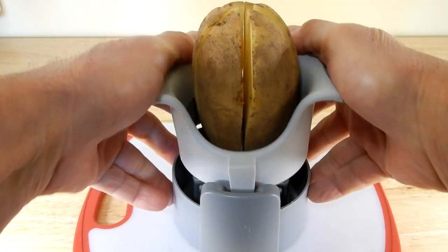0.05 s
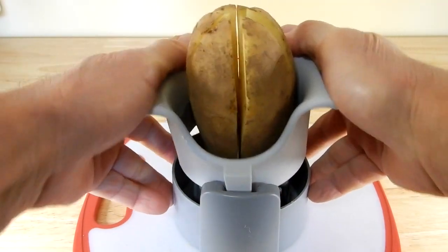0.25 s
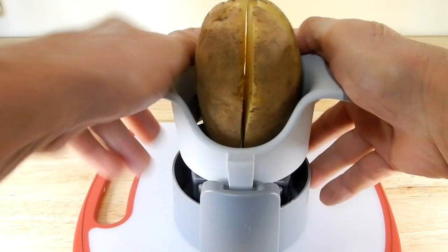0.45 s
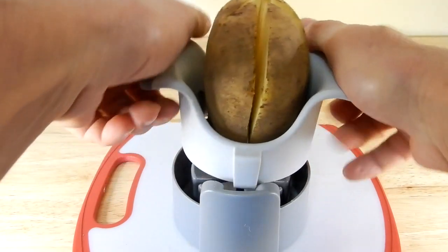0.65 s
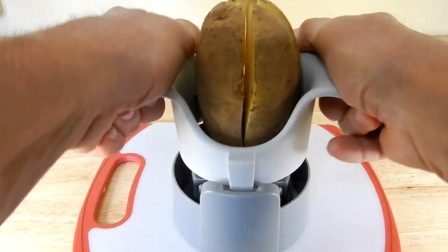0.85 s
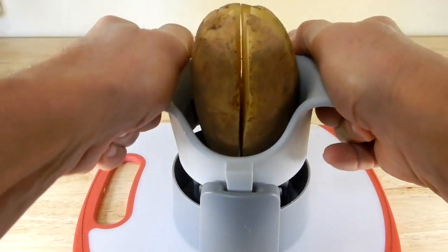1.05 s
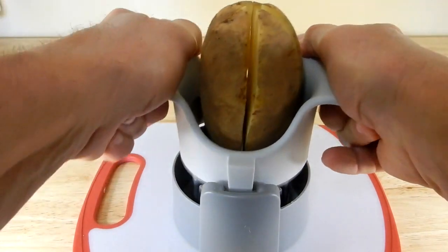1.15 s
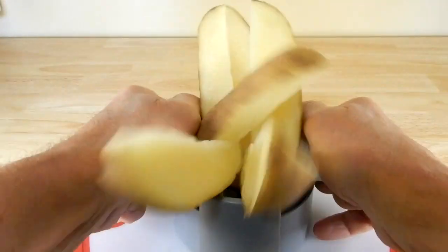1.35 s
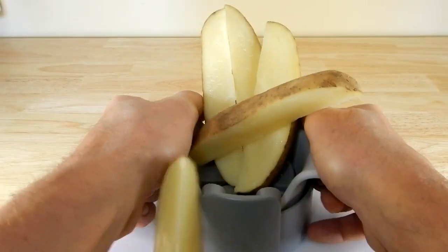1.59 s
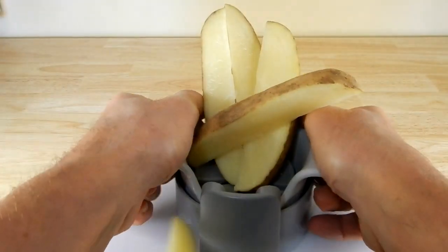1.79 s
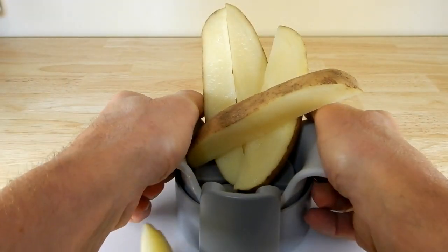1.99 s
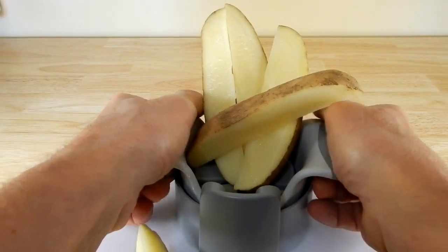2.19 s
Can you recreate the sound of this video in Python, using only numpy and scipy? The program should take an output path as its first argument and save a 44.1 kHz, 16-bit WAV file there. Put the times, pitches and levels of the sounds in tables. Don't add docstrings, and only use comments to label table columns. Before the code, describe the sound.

Close up in a small indoor room, hands creak and click a plastic potato cutter over low hum, then a sudden loud crunching crack hits, the hum dips, and cut pieces settle with dull taps.

```python
import sys
import numpy as np
from scipy import signal
from scipy.fft import rfft, irfft
from scipy.io import wavfile
from scipy.ndimage import uniform_filter1d

SR = 44100
rng = np.random.default_rng(int(sys.argv[2]) if len(sys.argv) > 2 else 0)


def linear_from_db(decibels):
    return 10 ** (np.asarray(decibels, float) / 20)


def store_wav(level_fs):
    pcm = np.round(np.clip(np.atleast_2d(level_fs), -1, 1) * 32767)
    wavfile.write(sys.argv[1], SR, pcm.T.astype(np.int16))


N = 98298
T = np.arange(N) / SR


def unit(x):
    return x / np.sqrt(np.mean(x ** 2))


def ring(x, hz, t60_s):
    pole = np.exp(2j * np.pi * hz / SR - np.log(1000) / (max(t60_s, 1e-3) * SR))
    return signal.lfilter([1], [1, -pole], x).imag


def band(x, hz, width_hz):
    return signal.lfilter(*signal.iirpeak(hz, hz / width_hz, SR), x)


def colour(x, table):
    hz, db = np.array(table, float).T
    f = np.maximum(np.arange(x.shape[-1] // 2 + 1) * SR / x.shape[-1], 1)
    gain = linear_from_db(np.interp(np.log(f), np.log(hz), db))
    return irfft(rfft(x) * gain, x.shape[-1])


def add(out, s, piece, db):
    i = int(max(s, 0) * SR)
    n = min(len(piece), N - i)
    out[i:i + n] += piece[:n] * linear_from_db(db) / np.max(np.abs(piece))


def push(length_s, size=8192):
    t = np.arange(size) / SR
    return np.where(t < length_s, 1 - np.cos(2 * np.pi * t / length_s), 0) + 1e-18


def puff(hz, width_hz, length_s, size=4096):
    t = np.arange(size) / SR
    envelope = np.exp(-t / length_s) * (1 - np.exp(-t / 0.0005))
    x = rng.standard_normal(size) * envelope
    x = band(band(x, hz, width_hz), hz, width_hz)
    return x / np.max(np.abs(x))


def walk(rate_hz):
    k = int(SR / rate_hz)
    steps = np.repeat(rng.standard_normal(N // k + 1), k)
    return 1.09 * uniform_filter1d(uniform_filter1d(steps, k), k)[:N]


def grains(rate_hz, spread_db):
    chance, sign, size = rng.random((3, N))
    return (chance < rate_hz / SR) * np.sign(sign - 0.5) * linear_from_db(-spread_db * np.log(size + 0.00036))


def tearing(env, table, rate_hz, spread_db, ring_db):
    ruptures = grains(rate_hz, spread_db)
    blades = sum(ring(ruptures, hz, 0.04) for hz in (2150., 2600., 4700.))
    return env * unit(unit(colour(ruptures, table)) + linear_from_db(ring_db) * unit(blades))


# (time [s], level [dB])
RIP_LEVEL = [
    (1.4, -55.5),
    (1.42, -43.5),
    (1.4239, -21),
    (1.431, -14.5),
    (1.442, -19),
    (1.469, -17),
    (1.482, -29),
    (1.493, -34),
    (1.494, -45),
    (1.55, -75),
]
# (frequency [Hz], level [dB])
RIP_COLOUR = [(150, -24), (650, -23), (1100, -11), (2100, -8), (3200, -3), (4700, -6), (7000, -13.5),
              (15500, -35.5)]
JUDDER_DB = 2.5


def rip():
    s, db = np.array(RIP_LEVEL).T
    level_db = np.interp(T, s, db, left=-120, right=-120) + JUDDER_DB * walk(350)
    return tearing(linear_from_db(level_db), RIP_COLOUR, 14000, 2.8, -8)


# (frequency [Hz], level [dB], t60 [s])
SLAM_MODES = [(203, -16, 0.092), (490, -20.5, 0.049), (1130, -5, 0.029), (1300, 7.5, 0.015),
              (1680, 0.5, 0.035), (2150, -3, 0.042), (2460, -20.5, .03), (2920, 0.5, 0.007),
              (4700, -6, 0.027), (1710, -31.5, 0.37), (6440, -30, 0.034), (7740, -37.5, .02),
              (9800, -18.5, .01)]
SLAM_S, SLAM_DB, SLAM_TICK_DB = 1.4696, 1.04, -11.5


def slam():
    out = np.zeros(N)
    force = push(0.0001)
    modes = sum(linear_from_db(db) * hz / 1000 * ring(ring(force, hz, 8.7 / hz), hz, t60) for hz, db, t60 in SLAM_MODES)
    add(out, SLAM_S, modes, SLAM_DB)
    add(out, SLAM_S, puff(6800, 9000, 0.00057), SLAM_TICK_DB)
    return out


# (time [s],
# peak level [dB], pitch [Hz], ring t60 [s])
SNAPS = [(.003, -33, 2470, 0.011), (.0243, -29, 2400, 0.0043), (0.0284, -20.5, 2520, 0.003),
         (0.0314, -33, 2360, 0.012), (0.0343, -34, 2560, .004), (0.038, -26, 2600, .005),
         (0.0385, -31, 4600, 0.0031), (0.0418, -31.5, 2580, 0.007), (0.059, -36, 2450, 0.008),
         (0.3808, -25.5, 2530, 0.0034), (0.3811, -0.5, 2530, 0.002), (0.3847, -16, 2570, 0.0017),
         (0.3847, -21.5, 2750, 0.0034), (0.388, -7.5, 2600, 0.0022), (0.3898, -19, 2440, 0.0034),
         (.437, -29, 2236, 0.0063), (1.4236, -7.5, 2150, 0.0041), (1.428, -10, 2000, .004),
         (1.4296, -12, 3630, 0.0034), (1.4316, -6, 2200, 0.0046), (1.4341, -7, 2670, 0.0012),
         (1.4351, -5.5, 2380, 0.0027), (1.4393, -14.5, 3800, 0.0057), (1.4446, -3, 1480, 0.0024),
         (1.448, -11, 2432, 0.0042), (1.4484, -6.5, 2720, 0.0018), (1.457, -13, 2603, 0.0038),
         (1.4672, -8.5, 1690, .003), (1.4693, -2.5, 1300, .004), (1.4361, -7.5, 2260, 0.0084),
         (1.4665, -8.5, 4600, 0.006), (1.4746, -5.5, 1757, 0.0096), (1.4778, -6, 1715, 0.013),
         (1.488, -24.5, 1510, 0.0065), (1.4902, -20, 1812, 0.008), (1.4929, -23.5, 1502, .004)]
SNAP_RISE_S = 0.0021


def snaps():
    out = np.zeros(N)
    force = np.diff(push(0.0001, size=2048))
    for s, db, hz, t60 in SNAPS:
        onset = ring(force, hz, SNAP_RISE_S)
        add(out, s, ring(ring(onset, 0.86 * hz, t60), 1.14 * hz, t60), db)
        add(out, s, puff(4700, 1100, 0.0013), db - 23.5)
    return out


# (time [s], peak level [dB], tilt [dB per octave], ring scale [ratio])
KNOCKS = [
    (0.7956, -12, 14, 1.26),
    (0.906, -26, 11, 0.19),
    (1.3946, -18.5, 15, 1.2),
    (1.4455, -9, 7.5, 0.79),
    (1.519, -26, 12.5, 0.272),
    (1.703, -67.5, -0.5, 1.03),
    (1.978, -53, 2.5, 0.73),
]
# (frequency [Hz], level [dB], t60 [s])
FRAME_MODES = [(1045, -1.8, 0.034), (1078, -8, 0.03), (1300, -8, 0.019), (1532, -8, 0.025),
               (1675, -9, 0.039), (2000, -13.5, .015), (2112, -12, 0.027), (3090, -24, .012),
               (4600, -25, 0.007)]


def knocks():
    out = np.zeros(N)
    force = np.diff(push(0.0001))
    for s, db, tilt_db, scale in KNOCKS:
        piece = 0
        for hz, mode_db, t60 in FRAME_MODES:
            swell = ring(force, hz, 0.011 * (1000 / hz) ** 1.41)
            level = linear_from_db(mode_db + tilt_db * np.log2(hz / 1000)) * 1000 / hz
            piece = piece + level * ring(swell, hz, t60 * scale)
        add(out, s, piece, db)
    return out


# (time [s], peak level [dB], pitch [Hz], ring t60 [s], slap level [dB])
THUDS = [(0.0999, -28.5, 268, 0.088, -3.5), (0.112, -32.5, 750, 0.015, -10), (.117, -34.5, 240, 0.087, -12),
         (.128, -37.5, 221.5, 0.16, -19), (0.149, -29, 392, 0.019, -3.5),
         (0.1522, -22.5, 310, 0.064, -13.5), (1.499, -39, 290, 0.13, -20),
         (1.543, -41.5, 252.6, 0.163, -6.5), (.806, -37.5, 300.7, 0.044, -20),
         (1.7725, -40, 450.6, 0.026, -19), (1.7756, -34.5, 501, 0.047, -24), (1.783, -38, 278.6, 0.16, -8),
         (1.8, -41.5, 521, .04, -23), (1.826, -39.5, 395.6, 0.019, -17), (1.817, -35.5, 523, 0.046, -18),
         (1.846, -44, 271.2, 0.11, -22), (2.0051, -30, 212, 0.064, -5.5), (2.009, -32, 578, 0.043, 0.5),
         (2.032, -36.5, 187.4, 0.086, -21), (2.1383, -27.5, 420, 0.023, -15.5),
         (2.148, -32, 312, 0.07, -29.5), (2.154, -30.5, 298, 0.058, -34), (2.176, -40.5, 404, 0.052, -29),
         (2.198, -43.5, 290, 0.11, -26.5)]
# (pitch ratio, level [dB])
BOARD_MODES = [(1, 9.5), (1.3, -8), (1.17, -4), (2.2, -8), (1.2, -5), (2.05, -9), (0.85, -9), (9.3, -37)]
RATTLE_DB, RATTLE_SHARE, THUD_SWELL_CYCLES = -9.5, 0.16, 5


def thuds():
    out = np.zeros(N)
    t = np.arange(8192) / SR
    for s, db, pitch_hz, t60, slap_db in THUDS:
        rattle = band(rng.standard_normal(len(t)), 1.9 * pitch_hz, 1.6 * pitch_hz)
        rattle = rattle * 4 * np.exp(-t / (RATTLE_SHARE * t60))
        force = push(0.00039) + linear_from_db(RATTLE_DB) * rattle
        piece = 0
        for ratio, mode_db in BOARD_MODES:
            hz = pitch_hz * ratio
            swell = ring(force, hz, THUD_SWELL_CYCLES / hz)
            piece = piece + linear_from_db(mode_db) * ratio * ring(swell, hz, t60 / ratio ** 0.55)
        add(out, s, piece, db)
        add(out, s, puff(1300, 2000, 0.0021), db + slap_db)
    return out


# (time [s], peak level [dB], pitch [Hz], length [s])
TICKS = [(0.024, -43.5, 9000, .001), (0.033, -39, 9800, 0.0015), (0.19, -38, 4370, .002),
         (1.4435, -19.5, 8700, 0.0019), (1.4225, -22, 5000, .001), (1.518, -37, 4170, .002),
         (.925, -27, 1400, .006), (0.2, -46, 5200, 0.0016), (0.66, -48.5, 2900, .002),
         (2.025, -47.5, 2800, .0015), (0.99, -37, 2000, 0.036), (0.28, -47.5, 6850, 0.0015),
         (0.38, -21.5, 5300, 0.00089), (0.57, -45, 6700, 0.018), (0.805, -41.5, 4400, .002),
         (0.72, -35.5, 4000, 0.0022), (1.776, -51.5, 3460, 0.0052), (2.0164, -28, 3220, 0.0012),
         (2.015, -54, 3540, 0.0026), (2.136, -60, 3970, 0.0036)]


def ticks():
    out = np.zeros(N)
    for s, db, hz, length_s in TICKS:
        add(out, s, puff(hz, hz, length_s), db)
    return out


# (time [s], peak level [dB], rise [s], fall [s])
RUBS = [(0.041, -40, 0.041, 0.055), (.2, -54, 0.033, 0.27), (0.347, -44.5, 0.013, 0.04),
        (0.536, -50.5, 0.0053, 0.016), (.65, -48, 0.052, 0.095), (0.819, -48.5, 0.022, 0.0063),
        (0.913, -44.5, 0.018, 0.03), (1.025, -51.5, 0.016, 0.032), (1.82, -65, 0.018, 0.021),
        (2.03, -56.5, .01, 0.012), (2.148, -50.5, 0.0089, 0.0078)]
# (frequency [Hz], level [dB])
RUB_COLOUR = [(240, -20), (400, -32.5), (694, -18), (821, -3.5), (1130, -6), (2590, 1.5), (3910, -5),
              (4630, 1), (15500, -36.5)]


def rubs():
    env = np.zeros(N)
    for s, db, rise_s, fall_s in RUBS:
        env += linear_from_db(db) * np.exp(np.where(T < s, -((T - s) / rise_s) ** 2, (s - T) / fall_s))
    return tearing(env, RUB_COLOUR, 6000, 0.69, -7.0)


def jolt():
    out = np.zeros((2, N))
    for port in out:
        add(port, 1.42, puff(40, 100, 0.029, size=8192), -49)
    return out


# (frequency [Hz], side level under mid [dB])
SIDE_COLOUR = [(60, -4), (200, -7), (600, -11), (1300, -21), (2400, -17), (4400, -12), (8000, -5),
               (14000, -3)]


def stereo_side(near):
    return colour(0.7 * signal.hilbert(near).imag + near * walk(500), SIDE_COLOUR)


ROOM_T60_S, ROOM_TREBLE_T60_S, ROOM_GAP_S = 0.24, 0.029, 0.0059
ROOM_BASS_T60_S, ROOM_BASS_DB = 0.4, 1.5


def room(x):
    t = np.arange(int(0.7 * SR)) / SR
    noise = rng.standard_normal((3, len(t)))
    noise = noise[0] + 0.35 * noise[1:]
    low = signal.lfilter(*signal.butter(2, 5500, fs=SR), noise)
    bass = signal.lfilter(*signal.butter(2, [220, 650], "band", fs=SR), noise)
    tail = bass * linear_from_db(ROOM_BASS_DB - 60 * t / ROOM_BASS_T60_S)
    tail = tail + low * linear_from_db(-60 * t / ROOM_T60_S)
    tail = tail + (noise - low) * linear_from_db(-60 * t / ROOM_TREBLE_T60_S)
    tail = tail * np.clip(t / ROOM_GAP_S, 0, 1)
    tail = tail / np.sqrt(np.sum(tail ** 2) / 2)
    return signal.fftconvolve(x[None], tail, axes=1)[:, :N]


# (frequency [Hz], level [dB])
HUM_COLOUR = [(15, -64), (25, -44.5), (421, -9), (457, -10), (722, -11.5), (848, -9.5), (1270, -12.5),
              (1710, -8), (15500, -40)]
# (frequency [Hz], width [Hz], level [dB])
HUM_BANDS = [(290, 77, -56), (493, 8.9, -61.5), (1645, 110, -62), (2100, 39, -68.5)]
HUM_DB, WHINE_HZ, WHINE_DB = -52, 829, -56.5
DUCK_S, DUCK_DB, DUCK_FALL_S, RECOVER_DB_S = 1.45, -19.5, 0.083, 4
DUCK_TREBLE_DB, DUCK_WHINE_DB = -12, -5


def hum():
    fall = np.clip((T - DUCK_S) / DUCK_FALL_S, 0, 1)
    mid, side = colour(rng.standard_normal((2, N)), HUM_COLOUR)
    out = mid + colour(side, SIDE_COLOUR) * 3.1 * np.array([[1], [-1]])
    out = unit(out) * linear_from_db(HUM_DB - 1.15) * linear_from_db(1.2 * walk(4))
    low = signal.lfilter(*signal.butter(2, 2200, fs=SR), out)
    out = low + (out - low) * linear_from_db(fall * DUCK_TREBLE_DB)
    for hz, width_hz, db in HUM_BANDS:
        out = out + linear_from_db(db + 1.9 * walk(7.86)) * unit(band(rng.standard_normal(N), hz, width_hz))
    whine = np.sqrt(2) * np.sin(2 * np.pi * np.cumsum(WHINE_HZ + 1.6 * walk(2.1)) / SR)
    out = out + linear_from_db(WHINE_DB + 0.48 * walk(2.1) + fall * DUCK_WHINE_DB) * whine
    return out * linear_from_db(fall * (DUCK_DB + RECOVER_DB_S * (T - DUCK_S)))


MIC_LOW_HZ, ROOM_DB = 142.1, -19.5


def scene():
    near = rip() + slam() + snaps() + knocks() + thuds() + ticks() + rubs()
    near = signal.sosfilt(signal.butter(3, MIC_LOW_HZ, "high", fs=SR, output="sos"), near)
    ports = near + stereo_side(near) * np.array([[1], [-1]]) + jolt()
    balance = linear_from_db(np.array([[-0.35], [0.35]]))
    return balance * (ports + linear_from_db(ROOM_DB) * room(near) + hum())


def low_pass(x):
    return signal.sosfilt(signal.butter(12, 15870, fs=SR, output="sos"), x)


def record(dry):
    mix = np.clip(dry, -1, 1)
    return low_pass(mix)


dry = scene()
out = record(dry)
store_wav(out)
```